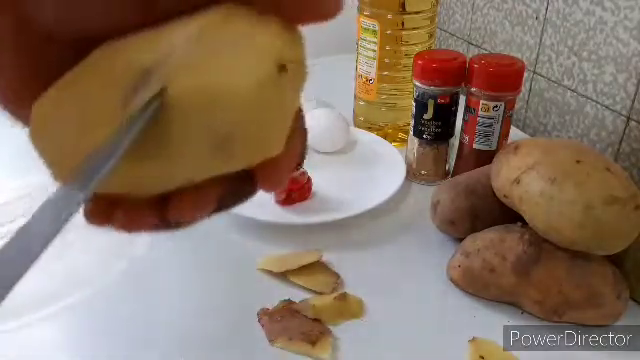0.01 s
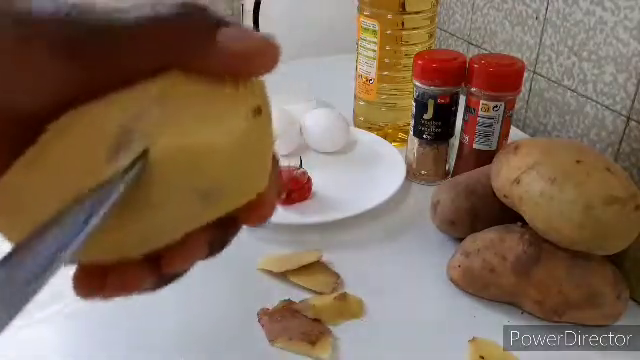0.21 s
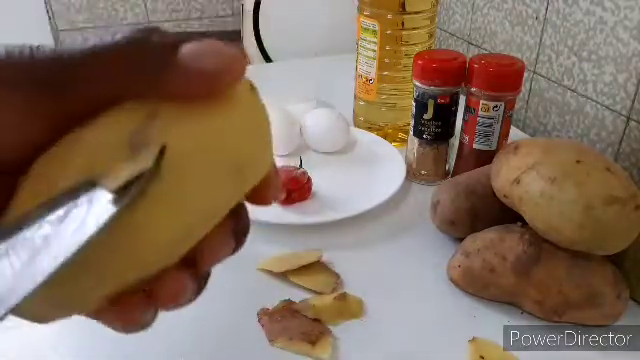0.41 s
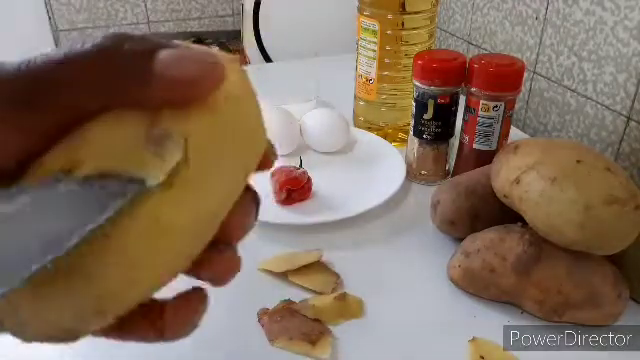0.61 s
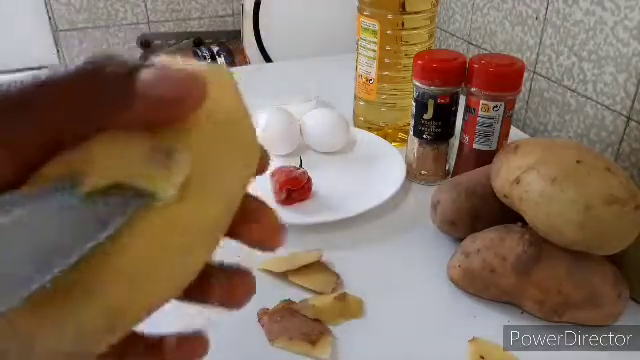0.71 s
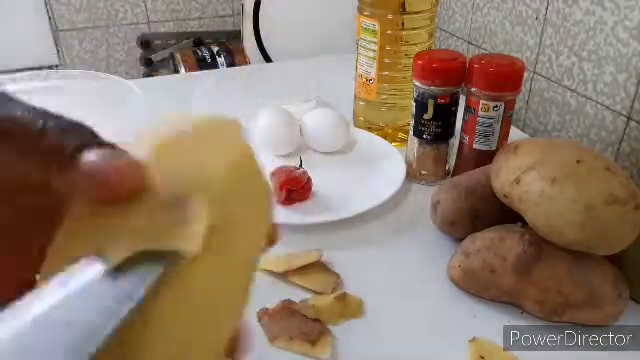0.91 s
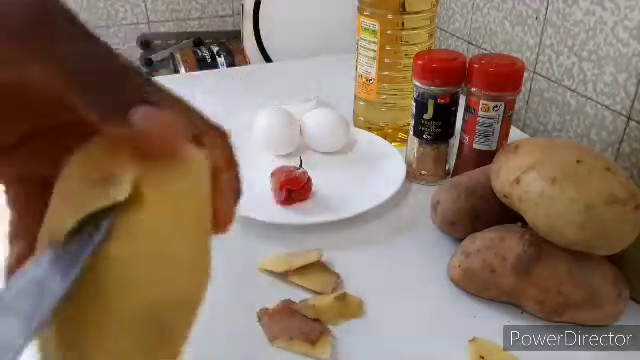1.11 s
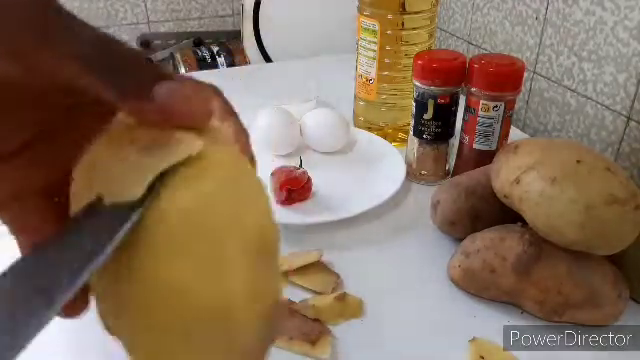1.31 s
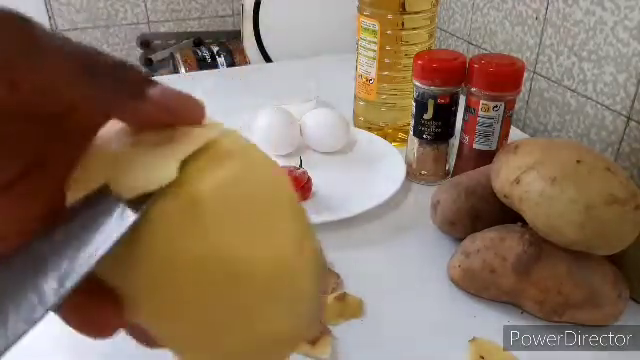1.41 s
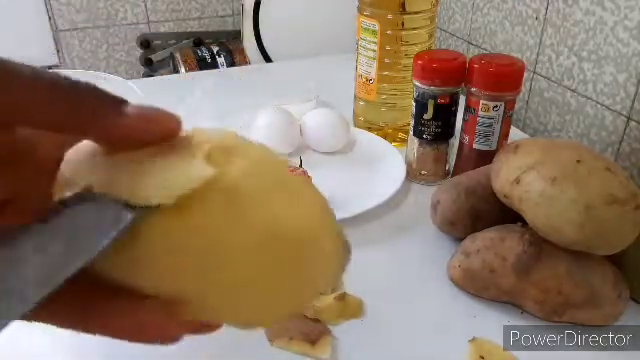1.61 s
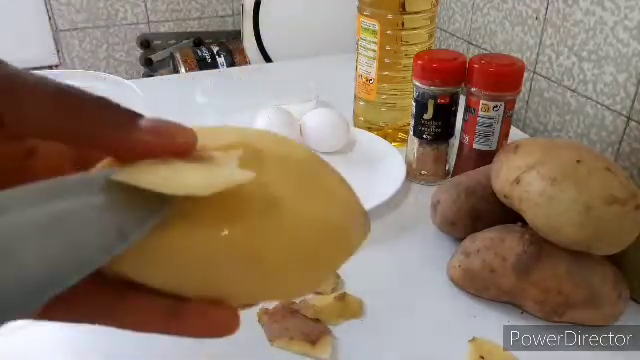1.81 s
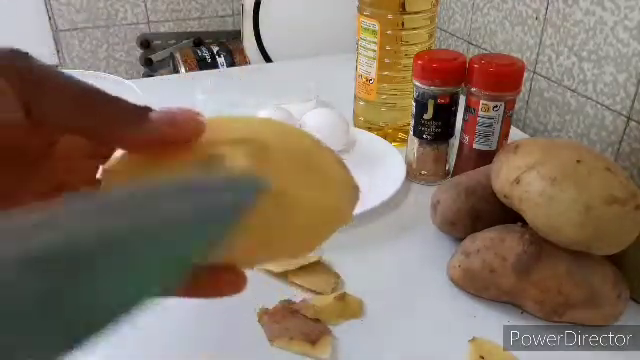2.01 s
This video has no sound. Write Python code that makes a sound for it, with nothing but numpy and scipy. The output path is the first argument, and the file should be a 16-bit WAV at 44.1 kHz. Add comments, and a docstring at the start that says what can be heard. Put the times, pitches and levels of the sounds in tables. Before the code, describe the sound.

A knife digs into a raw potato with crisp crackles and sharp snaps, pauses, then slides under the peel in a wet raspy hiss; close microphone, slightly left, small tiled kitchen with faint hum.

```python
"""Peeling a raw potato

A kitchen knife peels a potato by hand, close to the microphone and a little to its left. The blade digs in and
the crisp flesh crackles and snaps; then it slides under the peel in a wet, hissing stroke and scrapes free.
Contact sounds are filtered random clicks, and each snap adds a knock of decaying sines.
A small tiled kitchen answers with a decaying noise echo; an appliance hums as sines over rumbling room noise."""
import sys
import numpy as np
from scipy import signal
from scipy.fft import rfft, irfft
from scipy.io import wavfile
from scipy.ndimage import uniform_filter1d

SR = 44100
rng = np.random.default_rng(int(sys.argv[2]) if len(sys.argv) > 2 else 0)


def dump_mix(stems):
    """Bounce the given channels to the path in sys.argv[1] as a 16-bit WAV at rate SR."""
    frames = np.atleast_2d(stems).T  # one column per channel
    limited = np.clip(frames, -1, 1)  # hard clip at full scale
    pcm = np.round(limited * 32767).astype(np.int16)
    wavfile.write(sys.argv[1], SR, pcm)


N = 92610
TOP_HZ = 15500  # upper limit of the recorder
SLICE_PER_S, SLICE_SPREAD_DB = 8700, 3  # dense fine clicks of a sliding contact

# colour of breaking flesh: frequency_hz, level_db
FLESH_COLOUR = [(100, -32.5), (400, -20), (1000, -21), (1700, -23), (2200, -11), (3200, -14.5),
                (5300, -7.5), (7000, -7), (9200, 0.5), (10700, -6), (13000, 1.5), (15500, -3)]
# short resonances of blade and potato: centre_hz, width_hz, lift_db
BODY_RINGS = [(2430, 500, 3), (3970, 690, 12.5)]


def undb(db):
    """Decibels to gain."""
    return 10 ** (np.asarray(db) / 20)


def unit(x):
    """Scale to rms 1."""
    return x / np.sqrt(np.mean(x ** 2))


def curve(rows, axis=1):
    """Gain over time, interpolated in dB along one column of a table."""
    rows = np.array(rows)
    return undb(np.interp(np.arange(N) / SR, rows[:, 0], rows[:, axis]))


def pan(db):
    """Left and right gains; the right is lower by db."""
    return undb(np.array([[0], [-db]]))


def walk(rate):
    """Smoothed random wander with about `rate` new values a second, spread near 1."""
    hold = int(SR / rate)
    steps = np.repeat(rng.standard_normal(N // hold + 1), hold)
    smooth = uniform_filter1d(uniform_filter1d(steps, hold), hold)
    return 1.17 * smooth[:N]


def colour(x, points, rings=(), tilt_db=0):
    """Causal filter of unit power below TOP_HZ: broad colour, resonances, and tilt per octave above 2 kHz."""
    hz = np.maximum(np.arange(N + 1) * SR / (2 * N), 1)
    points = np.array(points)
    db = np.interp(np.log(hz), np.log(points[:, 0]), points[:, 1])
    db = db + tilt_db * np.log2(np.maximum(hz, 2000))
    for centre, width, lift in rings:
        db = db + lift / (1 + (2 * (hz - centre) / width) ** 2)
    gain = undb(db)
    # folding the cepstrum makes the filter minimum phase
    cepstrum = irfft(np.log(gain / np.sqrt(np.mean(gain[hz < TOP_HZ] ** 2))))
    cepstrum[1:N] *= 2
    response = np.exp(rfft(cepstrum[:N], 2 * N))
    return irfft(rfft(x, 2 * N) * response)[..., :N]


def bursts(per_s, spread_db):
    """Cells bursting at random: clicks of random sign and size, at rms 1."""
    size = np.minimum(rng.exponential(size=N), 5.5)
    happens = rng.random(N) < per_s / SR
    return unit(happens * undb(spread_db * size) * rng.choice([-1, 1], N))


def shifting(x, depth_db, per_s):
    """The moving contact lifts and drops bands of the sound independently."""
    hz = np.arange(N // 2 + 1) * SR / N
    band = 2.5 * np.log2(np.maximum(hz, 700) / 700)  # bands 0.4 octave apart, from 700 Hz
    spectrum, out = rfft(x), 0
    for k in range(13):
        part = irfft(spectrum * np.maximum(1 - abs(band - k), 0), N)
        out = out + part * undb(depth_db * walk(per_s))
    return out


def air():
    """Low rumble of the room: coloured noise, partly different in each ear, with a drifting level."""
    # colour of the room: frequency_hz, level_db
    air_colour = [(30, -23), (60, -0.5), (115, 7), (180, -0.5), (280, 4), (400, -7), (650, -10.5),
                  (1000, -23.5), (2000, -24.5), (5000, -32.5), (15000, -33.5)]
    # level over time: time_s, level_db
    air_level = [(0, -64), (.35, -59.5), (1.1, -63), (1.7, -61.5), (2.1, -65)]
    side_db, pan_db = -1.5, 0.5
    mid, side = colour(rng.standard_normal((2, N)), air_colour)
    stereo = mid + undb(side_db) * side * np.array([[1], [-1]])
    return stereo * curve(air_level) * pan(pan_db)


def hum():
    """Mains and motor lines of an appliance, slightly wavering sines; two close motor lines beat."""
    # lines before their level curves: frequency_hz, level_db, left_minus_right_db
    lines = [(49.5, -86, 10.5), (99, -72.5, 9), (148.2, -61.5, 5.5), (199.2, -76, 2), (260, -75.5, -1.5),
             (300.3, -71.5, 0), (314.8, -70, -2.5), (395.5, -77, -9), (445.5, -85, -9), (641.5, -85, -11)]
    # level of the low lines: time_s, level_db
    low_level = [(0, -1), (.75, -1.5), (1.1, -5), (1.5, 2), (1.78, 3), (1.95, -4)]
    # level of the motor lines: time_s, level_db
    motor_level = [(.18, -19), (.42, 0.5), (.9, 0), (1.82, 3), (1.92, -4.5)]
    motor_above_hz = 250
    drift, waver_db = .001, .7  # drift is a fraction of the frequency
    out = 0
    for hz, db, pan_db in lines:
        cycles = np.cumsum(hz * (1 + drift * walk(6))) / SR
        tone = np.sqrt(2) * np.sin(2 * np.pi * (cycles + rng.random()))
        level = curve(motor_level if hz > motor_above_hz else low_level)
        gain = undb(db + pan_db / 2 + waver_db * walk(7.3))
        out = out + tone * level * gain * pan(pan_db)
    return out


def kitchen(x):
    """Diffuse echo off the tiles, different in each ear; the treble dies sooner."""
    room_db, build_s = -10, 0.0083
    t60_s, treble_t60_s = 0.26, 0.18  # times to fall 60 dB
    t = np.arange(N // 3) / SR
    noise = rng.standard_normal((2, len(t)))
    low = signal.sosfilt(signal.butter(2, 6000, fs=SR, output="sos"), noise)
    high = signal.sosfilt(signal.butter(2, 6000, "high", fs=SR, output="sos"), noise)
    low_tail = low * np.exp(-np.log(1000) * t / t60_s)
    high_tail = high * np.exp(-np.log(1000) * t / treble_t60_s)
    tail = (low_tail - high_tail) * (1 - np.exp(-t / build_s))
    tail = unit(tail) / np.sqrt(len(t))  # unit energy
    return undb(room_db) * signal.fftconvolve(x[None], tail, axes=1)[:, :N]


def far_port(x):
    """The right port hears the knife later, weaker and smeared by the hands: direct sound plus scatter."""
    direct_db, scatter_db = -13, -14
    scatter_s, lag_s = .002, .0004
    t = np.arange(N // 200) / SR
    scatter = unit(rng.standard_normal(len(t)) * np.exp(-t / scatter_s)) / np.sqrt(len(t))
    response = undb(scatter_db) * scatter
    response[0] += undb(direct_db)
    shaded = signal.fftconvolve(x, response)[:N]
    return np.interp(np.arange(N) - np.round(lag_s * SR), np.arange(N), shaded)


def rubbing():
    """Fingers turn the damp potato with a dull rub of dense clicks."""
    # level over time: time_s, level_db
    rub_level = [(0, -81.5), (.17, -69), (.29, -87), (.37, -72), (.75, -66.5), (1.02, -81.5), (1.2, -81),
                 (1.44, -55), (1.5, -61.5), (1.63, -66), (1.75, -58), (1.88, -81)]
    # colour of the rub: frequency_hz, level_db
    rub_colour = [(500, -2.5), (900, -6), (1400, 6.5), (1750, -6.5), (2300, -2), (8000, -30)]
    return colour(bursts(SLICE_PER_S, SLICE_SPREAD_DB) * curve(rub_level), rub_colour)


def scraping():
    """The freed blade catches a few times, in swells of dense clicks, and rings faintly."""
    # catches, fading to 1/e on each side: time_s, level_db, half_length_s
    catches = [(1.974, -56, 0.0086), (1.995, -43, 0.0063), (2.01, -46.5, 0.0048), (2.026, -47, 0.0083)]
    # colour of the scrape: frequency_hz, level_db
    scrape_colour = [(300, 7), (1000, -0.5), (3500, -1), (7300, -7.5), (14000, 3.5)]
    # its resonances: centre_hz, width_hz, lift_db
    scrape_rings = [(2454, 170, 16), (4680, 560, 7), (11500, 440, 8.5)]
    t = np.arange(N) / SR
    envelope = sum(undb(db) * np.exp(-abs(t - at) / half) for at, db, half in catches)
    return colour(bursts(SLICE_PER_S, SLICE_SPREAD_DB) * envelope, scrape_colour, scrape_rings)


def dragging():
    """The skin grips the blade in short gritty surges, each ringing at its own pitch."""
    # surges, fading to 1/e on each side: time_s, level_db, half_length_s, ring_hz
    surges = [(.735, -49.5, 0.016, 4150), (1.363, -56.5, 0.031, 4400), (1.419, -52.5, 0.013, 3550),
              (1.49, -45.5, 0.044, 4950), (1.561, -49.5, 0.024, 4700), (1.658, -57.5, 0.017, 3880)]
    # colour of the drag: frequency_hz, level_db
    drag_colour = [(1000, -17.5), (3000, -4), (4500, -3.5), (7000, -19)]
    per_s, spread_db = 840, 3
    width_hz, lift_db = 800, 9.5
    t, out = np.arange(N) / SR, 0
    for at, db, half, hz in surges:
        grit = bursts(per_s, spread_db) * np.exp(-abs(t - at) / half)
        out = out + undb(db) * colour(grit, drag_colour, [(hz, width_hz, lift_db)])
    return out


def slicing():
    """The blade slides under the skin with a wet hiss and rasps as the strip parts."""
    # the stroke: time_s, hiss_level_db, rasp_level_db
    stroke = [(1.18, -78, -82), (1.212, -57, -73), (1.245, -52, -58), (1.36, -52.5, -58), (1.46, -42, -51),
              (1.555, -44.5, -49), (1.62, -55.5, -55), (1.65, -49.5, -51), (1.71, -46, -50),
              (1.762, -40, -30.5), (1.785, -50.5, -33), (1.835, -51, -57), (1.87, -62, -66),
              (1.94, -82, -59.5), (2.1, -69, -75)]
    # colour of the wet hiss: frequency_hz, level_db
    hiss_colour = [(100, -9), (300, -6), (800, -6), (1700, -7), (2300, -6), (3000, -3), (4700, 2.5),
                   (7300, -3.5), (10000, 4.5), (13500, 5.5), (15500, 2.5)]
    # colour of the rasp of parting peel: frequency_hz, level_db
    rasp_colour = [(500, -17.5), (1600, -22.5), (2300, -9.5), (3200, -20.5), (3900, -2), (5000, 2.5),
                   (7500, 2), (10500, -2), (13000, -1), (15500, -0.5)]
    # resonances of the blade under the peel: centre_hz, width_hz, lift_db
    peel_rings = [(2417, 1100, 6.5), (3810, 500, 7), (4900, 1200, -0.5), (6060, 380, 5.5)]
    grip = undb(0.72 * walk(110))  # hiss and rasp waver together
    hiss_cells = bursts(SLICE_PER_S, SLICE_SPREAD_DB) * curve(stroke, axis=1)
    hiss = colour(hiss_cells * grip, hiss_colour)
    rasp_cells = bursts(SLICE_PER_S, SLICE_SPREAD_DB) * curve(stroke, axis=2)
    rasp = colour(rasp_cells * grip, rasp_colour, peel_rings)
    return shifting(hiss + rasp, depth_db=2.0, per_s=23)


def digging():
    """Uneven crackle of small tears as the blade is pushed into the flesh; the body rings only faintly."""
    # level of the crackle: time_s, level_db
    dig_level = [(0, -48), (.09, -57.5), (.19, -46), (.32, -44.5), (.338, -32.5), (.375, -35.5),
                 (.395, -46), (.425, -59), (.49, -56), (.65, -51), (.73, -46), (.79, -63), (.9, -69),
                 (1.02, -84.5)]
    per_s, spread_db = 1500, -0.5
    catch = undb(1.35 * walk(250))
    rings = [(hz, width, lift / 2) for hz, width, lift in BODY_RINGS]
    tears = bursts(per_s, spread_db) * curve(dig_level) * catch
    return shifting(colour(tears, FLESH_COLOUR, rings), depth_db=3.5, per_s=33.3)


def snaps():
    """Each snap is a crack that runs through the cells in a few milliseconds and knocks blade and potato."""
    # snaps of the flesh: time_s, level_db, decay_s, treble_tilt_db_per_octave
    breaks = [(0.1994, -27, 0.0022, 3), (0.267, -31.5, 0.002, 4), (0.2752, -30.5, 0.0024, 0),
              (0.33, -24, 0.0021, 2), (0.3339, -14.5, .001, 5), (0.35, -26.5, 0.0056, 1),
              (0.3704, -23, 0.0043, 0.5), (0.3996, -26, 0.00089, 4.5), (0.4215, -14.5, 0.001, 1.2),
              (0.4885, -38, 0.00092, 11), (0.6027, -32, .0009, 6), (0.6555, -16, 0.0012, 0.8),
              (0.68, -33.5, 0.0037, -2), (0.827, -50, .002, 1), (1.207, -44.5, .002, 2.5)]
    rise_s = 0.0001
    strain_db, strain_s = -19.5, 0.005  # cells giving around the snap, relative to it
    # knock relative to its snap: base dB, and dB per dB of snap level
    knock_db, knock_growth = -6.5, 0.55
    knock_s, knock_rise_s = .0014, .0008
    t, out = np.arange(N) / SR, 0
    for at, db, decay, tilt in breaks:
        age, before = np.maximum(t - at, 0), np.maximum(at - t, 0)
        envelope = np.exp(-np.maximum(age - rise_s, 0) / decay - before / rise_s)
        envelope = envelope + undb(strain_db) * np.exp(-abs(t - at) / strain_s)
        cells = envelope * rng.choice([-1, 1], N)
        crack = unit(colour(cells, FLESH_COLOUR, BODY_RINGS, tilt)) * np.sqrt(np.mean(envelope ** 2))
        tones = sum(np.sin(2 * np.pi * hz * age) for hz, _, _ in BODY_RINGS)
        knock = tones * np.exp(-age / knock_s) * (1 - np.exp(-age / knock_rise_s))
        knock_gain = undb(knock_db + knock_growth * db - 2 * tilt)  # brighter snaps knock less
        out = out + undb(db) * (crack + knock_gain * knock)
    return out


def scene():
    """Knife and potato in the kitchen, reaching the left port first, over the hum and the room."""
    knife = snaps() + digging() + slicing() + dragging() + scraping() + rubbing()
    ports = np.array([knife, far_port(knife)])
    return ports + kitchen(knife) + hum() + air()


def record(dry):
    """The recorder cuts the top with a steep low-pass at TOP_HZ."""
    return signal.sosfilt(signal.ellip(10, .2, 70, TOP_HZ, fs=SR, output="sos"), dry)


dry = scene()
out = record(dry)
dump_mix(out)
```